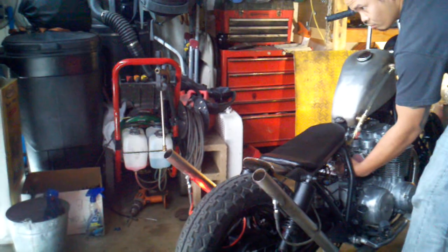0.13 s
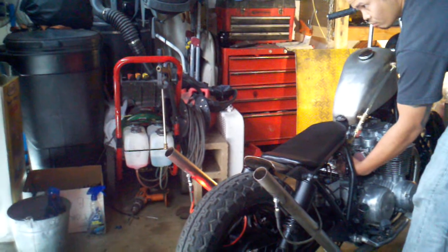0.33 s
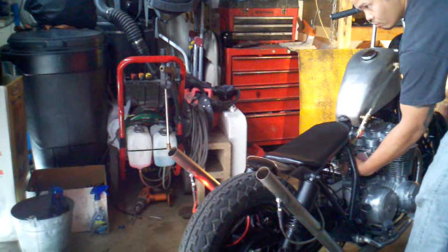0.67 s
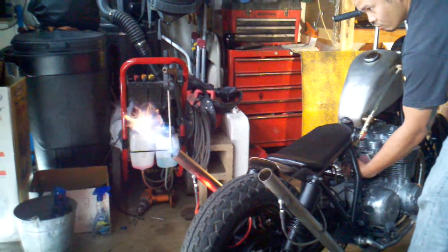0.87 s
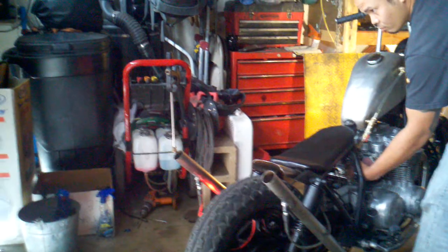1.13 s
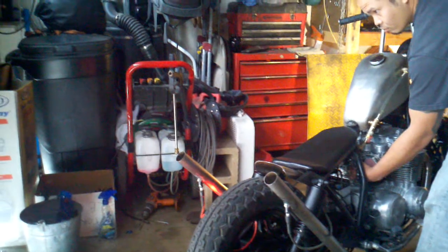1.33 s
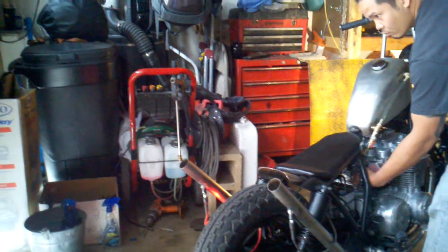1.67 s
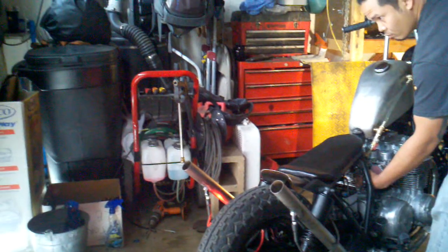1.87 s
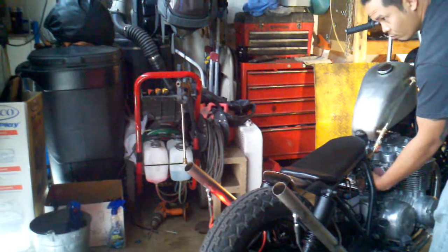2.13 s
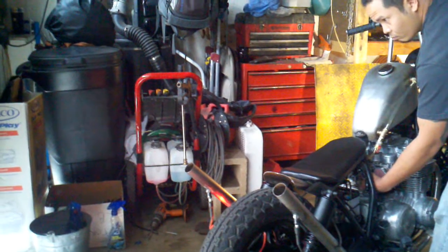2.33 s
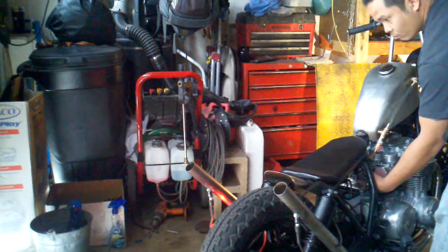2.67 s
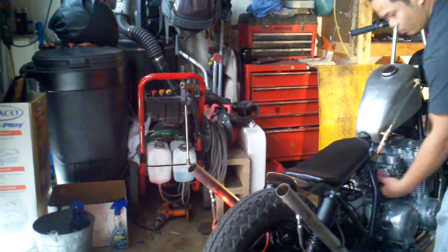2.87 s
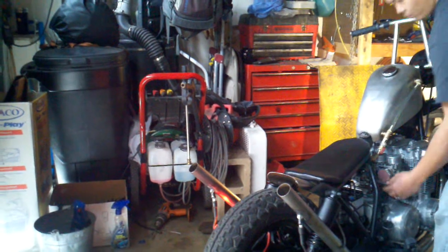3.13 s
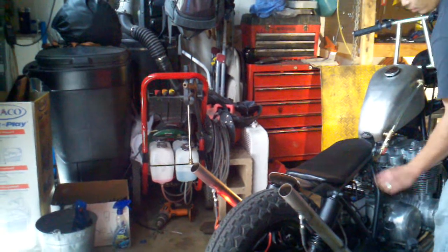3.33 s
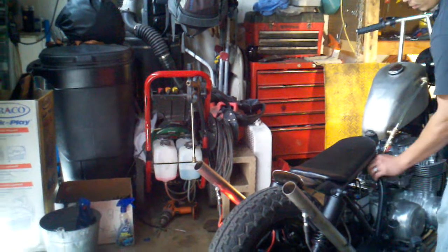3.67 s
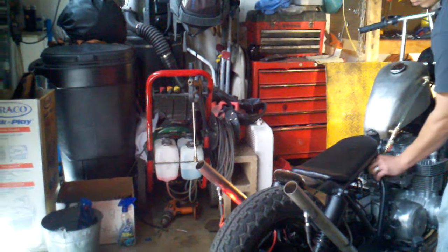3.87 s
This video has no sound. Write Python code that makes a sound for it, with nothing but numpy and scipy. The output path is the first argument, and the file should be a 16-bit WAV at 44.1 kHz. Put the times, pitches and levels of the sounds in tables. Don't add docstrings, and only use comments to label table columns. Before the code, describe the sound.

A four-cylinder motorcycle on open pipes catches at once, with uneven bangs, sharp spits and cold mechanical clatter until about 0.6 s. Revs climb to a barking peak near 1.15 s, then fall until 1.8 s. A harder, ragged blip peaks around 2.25 s, crackling as the throttle shuts. It coasts down, quieter, to low idle pulsing by 3.6 s, with faint spits. Short, diffuse garage echo, wide stereo.

```python
import sys
import numpy as np
from scipy import signal
from scipy.fft import rfft, irfft, next_fast_len
from scipy.io import wavfile
from scipy.ndimage import uniform_filter1d

SR = 44100
rng = np.random.default_rng(int(sys.argv[2]) if len(sys.argv) > 2 else 0)


def waveform_to_disk(signal):
    frames = np.transpose(np.atleast_2d(signal))
    scaled = np.clip(frames, -1, 1) * 32767
    samples = np.round(scaled).astype(np.int16)
    wavfile.write(sys.argv[1], SR, samples)


def gain_from_decibels(decibels):
    exponent = np.asarray(decibels, float) / 20
    return 10 ** exponent


N = 176400
T = np.arange(N) / SR
COASTING_FROM_S = 2.24


def in_time(rows):
    s, *columns = np.transpose(rows)
    return [np.interp(T, s, c) for c in columns]


def rms_one(x):
    return x / np.sqrt(np.mean(x ** 2) + 1e-20)


def evened(x):
    return x / np.sqrt(uniform_filter1d(x ** 2, size=9000) + 1e-12)


def coloured(x, points):
    hz, db = np.transpose(points)
    grid = np.arange(2049) * SR / 4096 + 1
    cepstrum = irfft(np.interp(np.log(grid), np.log(hz), db) * np.log(10) / 20)
    cepstrum[1:2048] *= 2
    cepstrum[2049:] = 0
    return signal.fftconvolve(x, irfft(np.exp(rfft(cepstrum))))[:N]


def butter(x, order, hz, kind="low"):
    return signal.sosfilt(signal.butter(order, hz, kind, fs=SR, output="sos"), x)


def resonance(x, hz, width_hz):
    r = np.exp(-np.pi * width_hz / SR)
    numerator = np.array([1, 0, -1]) * (1 - r * r) / 2
    return signal.lfilter(numerator, [1, -2 * r * np.cos(2 * np.pi * hz / SR), r * r], x)


def fading(clicks, decay_s):
    return signal.lfilter([1], [1, -np.exp(-1 / (decay_s * SR))], clicks + 1e-18)


def wavering(depth_db, per_s):
    steps = np.clip(rng.standard_normal(200), -2, 2)
    return gain_from_decibels(depth_db * np.interp(T * per_s, np.arange(200), steps))


def spread_over_ports(mid, side, hz):
    port_gap_m = 0.1
    alike = np.sinc(2 * hz * port_gap_m / 343)
    return mid * np.sqrt((1 + alike) / 2), side * np.sqrt((1 - alike) / 2)


# start_s, speed_cycles_per_s (four-stroke cycles)
SPEED = [(0.0, 12.47), (0.2, 16.02), (0.4, 19.63), (0.6, 20.87), (0.83, 23.89), (1.04, 28.23),
         (1.16, 31.61), (1.27, 29.55), (1.42, 25.28), (1.6, 22.88), (1.78, 21.89), (1.99, 25.38),
         (2.07, 27.4), (2.17, 33), (2.24, 36.3), (2.46, 27.4), (2.86, 18.96), (3.27, 15.4), (3.6, 13.89),
         (4.0, 13.9)]


def engine_cycle():
    start_cycle = -.806
    return start_cycle + np.cumsum(in_time(SPEED)[0]) / SR


CYLINDER_DB = [10.5, 5.5, -10, -10]
# start_s, peak_db
BANGS = [(0.062, -4), (0.132, -2), (0.211, 2), (0.257, -6.5), (0.316, -6), (0.368, -2), (0.421, -3.5),
         (0.469, -23), (0.519, -8.5), (0.57, -9), (0.618, -6), (0.663, -43), (0.708, -2.5),
         (0.732, -7), (0.777, -6.5), (0.88, 1.5), (0.918, -3.5), (0.959, -5), (1.038, -15), (1.08, 0),
         (1.92, -31), (1.958, -13), (1.998, -5), (2.008, -6), (2.046, -1.5), (2.056, -7),
                (2.082, -17), (2.088, -0.5), (2.1, -30), (2.112, -7), (2.127, -3), (2.137, 0), (2.149, -16),
                (2.157, -21), (2.167, 2), (2.181, 7), (2.191, -27), (2.2603, 3.5), (2.288, 0), (2.319, 2)]


def firings(cycle, uneven):
    scatter_db = np.where(T < COASTING_FROM_S, 1.3, 2.2)
    jitter_s_per_db, bang_db = .00014, 8
    quarter = np.floor(4 * cycle).astype(int)
    at = np.flatnonzero(np.diff(quarter)) + 1
    chance = np.clip(rng.standard_normal((600, 2)), -1.8, 1.8)[:len(at)]
    db = np.array(CYLINDER_DB)[quarter[at] % 4] * uneven[at] + scatter_db[at] * chance[:, 0]
    at = at + (jitter_s_per_db * scatter_db[at] * SR * chance[:, 1]).astype(int)
    for s, peak_db in BANGS:
        nearest = np.argmin(np.abs(at - s * SR))
        at[nearest] = s * SR
        db[nearest] = peak_db + bang_db
    clicks = np.zeros(N)
    clicks[np.clip(at, 0, N - 1)] = gain_from_decibels(db)
    return clicks


# pitch_hz,
# width_hz, level_db
RESONANCES = [(390, 200, -21), (190, 26, -7), (269, 18, 0), (316, 22, 0.5), (402, 28, -4), (434, 36, -2),
              (488, 34, -9),
              (539.8, 29, -13), (741, 102, -23.5), (1034, 53, -21), (1290, 50, -23), (1461, 69, -29.5),
              (1787, 30, -16), (2155, 220, -19)]


def ring_resonances(x, rasp_db):
    bark_above_hz = 640
    total = 0
    for k, (hz, width_hz, db) in enumerate(RESONANCES):
        bark = gain_from_decibels(rasp_db) if hz > bark_above_hz else 1
        total = total + (-1) ** k * gain_from_decibels(db) * resonance(x, hz, width_hz) * bark
    return total


# order_per_cycle, level_db, slope_db_per_cycle_per_s (change with speed)
ORDER_LINES = [(2, -30.5, -0.06), (3, -25, -1.86), (4, -12.5, -0.24), (5, -24.5, 0.88), (6, -17, 0.16),
               (7, -20, -1.5), (8, -17.5, 0.7)]
# order_per_cycle, level_db
RESONANT_ORDERS = [(6, -15), (8, -57), (9, -40), (10, -60), (11, -28.5), (12, -7), (13, -25.5), (14, -9),
                   (15, -16), (16, -8.5), (17, -9.5), (18, -0.5), (19, -21), (20, -14)]


def orders(cycle, rasp_db):
    waver_db, waver_per_s, mean_speed = 2.5, 14, 22
    faster = np.gradient(cycle) * SR - mean_speed
    lines, through = 0, 0
    for k, db, slope in ORDER_LINES:
        gain = wavering(waver_db, waver_per_s) * gain_from_decibels(db + slope * faster)
        lines = lines + gain * np.sin(2 * np.pi * k * cycle)
    for k, db in RESONANT_ORDERS:
        through = through + wavering(waver_db, waver_per_s) * gain_from_decibels(db) * np.cos(2 * np.pi * k * cycle)
    return lines, ring_resonances(through, rasp_db)


# pitch_hz, level_db
HISS = [(100, -32), (500, 1), (1200, -9), (2200, -24), (3500, -30.5), (5500, -29.5), (8500, -36),
        (13000, -38.5)]
# start_s, level_db
STEADY = [
    (0, 9.5),
    (.4, 4.5),
    (1.0, 8.5),
    (1.12, 7),
    (1.45, -4.5),
    (1.75, -3),
    (2.06, 11.5),
    (2.16, -25),
    (2.6, -18.5),
    (4, 6),
]
# start_s, exhaust_level_db, rasp_db, unevenness (of the cylinders, about 0-1)
THROTTLE = [(0, -25.5, -6, 0.1), (.1, -23, 8.5, 0.8), (.3, -20, -5.5, 1.2), (.6, -16, 0.5, 0.7),
            (.85, -17.5, 1, 0), (1.03, -17, 8.5, 0.35), (1.08, -20, -4.5, 0.38), (1.28, -19, 1.5, 0.14),
            (1.54, -21.5, -3.5, 0.22), (1.87, -20, -4, 0), (1.98, -17, 4, 0.4), (2.1, -14, 0.5, 0.9),
            (2.2, -16, 2, 0.95), (2.31, -14.5, 8, 0.47), (2.36, -20.5, 3.5, 0.7), (2.5, -24.5, 3.5, 0.3),
            (3, -29.5, -13, 0), (4, -31, -6.5, 0)]


def exhaust(cycle):
    turbulence_s, hiss_decay_s, hiss_db = .008, 0.015, -18.5
    level_db, rasp_db, uneven = in_time(THROTTLE)
    clicks = firings(cycle, np.clip(uneven, 0, 2))
    swirl_db = np.where(T < COASTING_FROM_S, -35, -26)
    swirl = gain_from_decibels(swirl_db) * fading(clicks, turbulence_s) * rng.standard_normal(N)
    rings = butter(ring_resonances(clicks + swirl, rasp_db), 2, [135, 850], "band")
    hiss = evened(coloured(fading(clicks, hiss_decay_s) * rng.standard_normal(N), HISS))
    lines, drone = orders(cycle, rasp_db)
    steady = gain_from_decibels(in_time(STEADY)[0])
    return gain_from_decibels(level_db) * (evened(rings) + gain_from_decibels(hiss_db + rasp_db) * hiss + lines + steady * drone)


# start_s, peak_db
SPITS = [(0.0014, -14), (0.0605, -10), (0.077, -17), (0.1316, -22), (0.1475, -15), (0.198, -23),
         (0.211, -16), (0.258, -40), (0.2706, -17.5), (0.3164, -22), (0.324, -19), (0.367, -16.5),
         (0.377, -25), (0.418, -20), (0.546, -24), (2.048, -34), (2.2605, -39), (2.29, -28), (2.3201, -34),
         (3.218, -35), (3.3756, -37), (3.4127, -39), (3.5149, -45), (3.8751, -36)]


def spits():
    spit_db, rise_s, decay_s = 1.5, .0005, 0.0048
    colour = [(600, -27), (1500, 3.5), (3000, -5.0), (8500, 3.5), (13000, -2)]  # pitch_hz, level_db
    s, db = np.transpose(SPITS)
    clicks = np.zeros(N)
    clicks[(s * SR).astype(int)] = gain_from_decibels(db + spit_db)
    burst = fading(clicks, decay_s) - fading(clicks, rise_s)
    return coloured(burst * rng.standard_normal(N), colour)


# pitch_hz, level_db
GEAR = [(40, -36), (120, -1), (300, -0.5), (600, -8), (1000, -21.5), (2200, -16), (4000, -31.5),
        (8500, -29), (13000, -35)]


def valve_gear(cycle):
    gear_db, follows_throttle, tick_depth = -32, 0.63, .15
    cold_clatter_db, warming_s = 12.5, 0.45
    flutter_db, flutter_per_s = 1.1, 26
    exhaust_db = in_time(THROTTLE)[0]
    pulse = (1 + tick_depth * np.cos(16 * np.pi * cycle)) * wavering(flutter_db, flutter_per_s)
    mid, side = (rfft(rms_one(coloured(pulse * white, GEAR))) for white in rng.standard_normal((2, N)))
    mid, side = spread_over_ports(mid, side, np.arange(len(mid)) * SR / N)
    cold_db = cold_clatter_db * np.exp(-T / warming_s)
    load_db = follows_throttle * (exhaust_db - exhaust_db.mean())
    return gain_from_decibels(gear_db + cold_db + load_db) * irfft(np.array([mid + side, mid - side]), N)


def garage(x, room_db):
    low_t60_s, high_t60_s, split_hz, bass_tail_db = 0.44, 0.15, 650, -13
    direct_lag_s, side_db = .00006, -0.5
    t = np.arange(SR // 2) / SR
    white = rng.standard_normal((2, len(t)))
    low = butter(white, 2, split_hz) * gain_from_decibels(bass_tail_db - 60 * t / low_t60_s)
    high = butter(white, 2, split_hz, "high") * gain_from_decibels(-60 * t / high_t60_s)
    tails = (low + high) * np.clip(t / 0.0079 - .4, 0, 1)
    size = next_fast_len(N + SR)
    hz = np.arange(size // 2 + 1) * SR / size
    mid, side = rfft(tails / np.sqrt(np.sum(tails[0] ** 2)), size) * gain_from_decibels(room_db)
    mid, side = spread_over_ports(mid, side, hz)
    side = side * gain_from_decibels(side_db)
    turn = np.exp(1j * np.pi * hz * direct_lag_s)
    return irfft(rfft(x, size) * np.array([turn + mid + side, 1 / turn + mid - side]), size)[:, :N]


def scene():
    cycle = engine_cycle()
    return garage(exhaust(cycle), 3.5) + garage(spits(), -6) + valve_gear(cycle)


def top_cut(x):
    return signal.sosfilt(signal.butter(12, 14300, fs=SR, output="sos"), x)


def record(dry):
    port_low_cut_hz, port_mismatch_db = [11, 30.7], 1.5
    cross_gain, cross_lag_s, cross_fade_hz = .997, 17 / 44100, 6000
    master_db, limit = -1.5, .95
    size = next_fast_len(N + SR // 4)
    hz = np.arange(size // 2 + 1) * SR / size
    low_cuts = np.array([1j * hz / (cut + 1j * hz) for cut in port_low_cut_hz])
    ports = rfft(dry, size) * low_cuts * gain_from_decibels(port_mismatch_db * np.array([[.5], [-.5]]))
    cross = cross_gain * np.exp(-2j * np.pi * hz * cross_lag_s) / (1 + (hz / cross_fade_hz) ** 4)
    x = irfft(ports - cross * ports[::-1], size)[:, :N]
    x = limit * np.tanh(gain_from_decibels(master_db) * x / limit)
    x = butter(x, 2, 34, "high")
    x = signal.sosfilt(signal.cheby2(14, 34, 14050, fs=SR, output="sos"), x)
    return top_cut(x)


dry = scene()
out = record(dry)
waveform_to_disk(out)
```